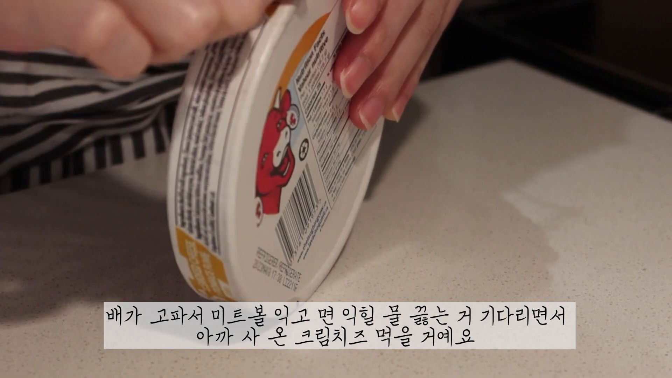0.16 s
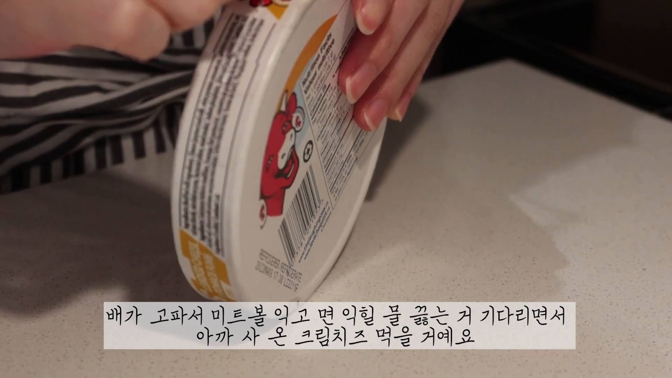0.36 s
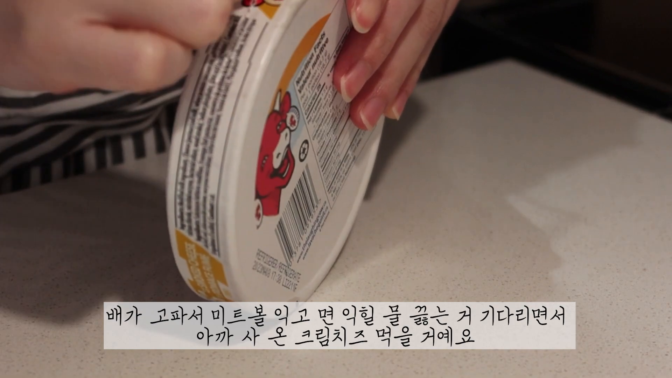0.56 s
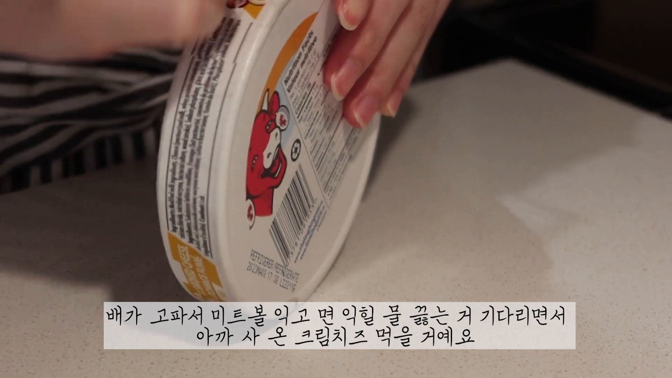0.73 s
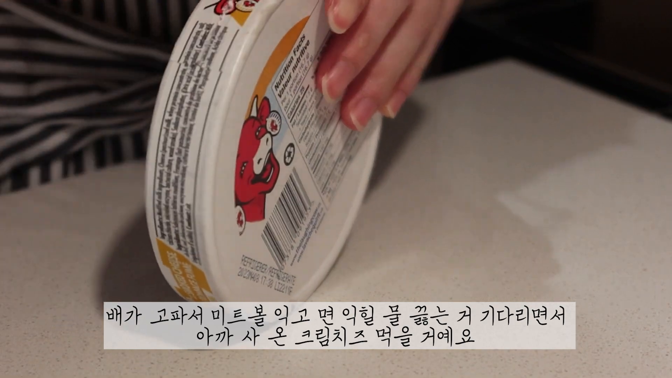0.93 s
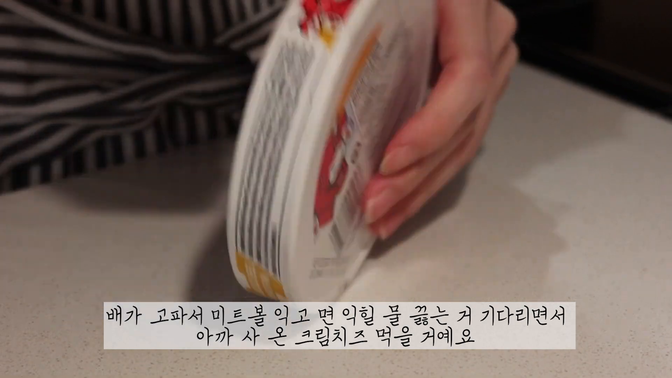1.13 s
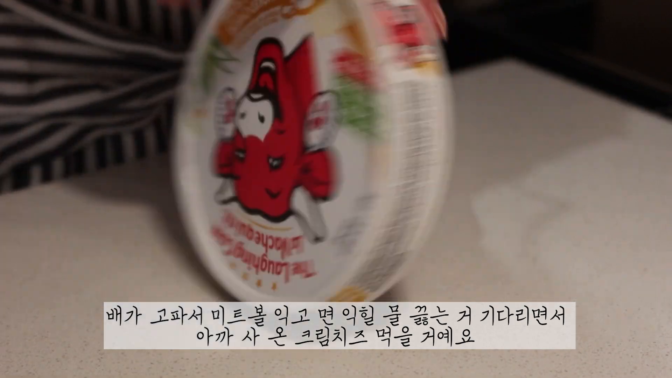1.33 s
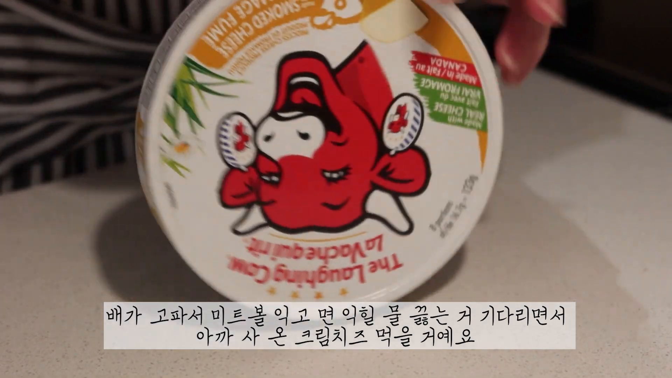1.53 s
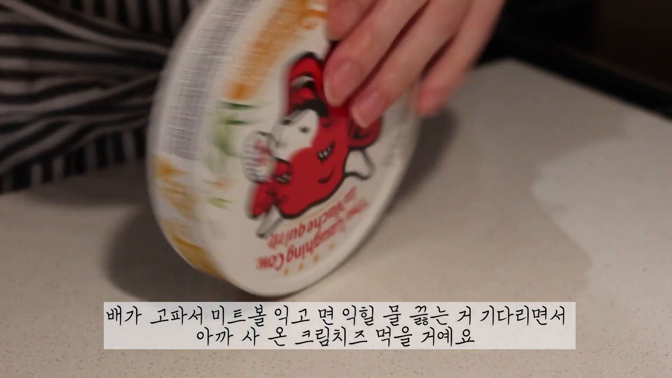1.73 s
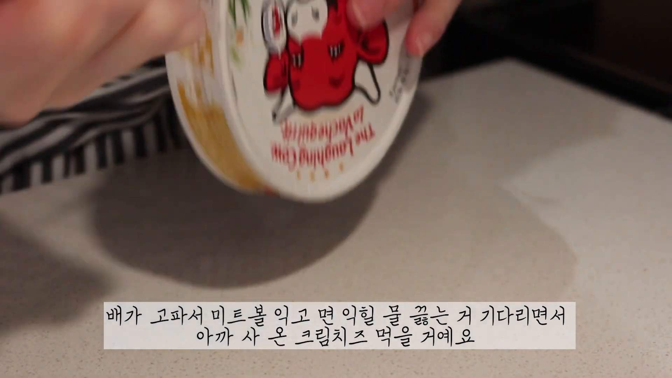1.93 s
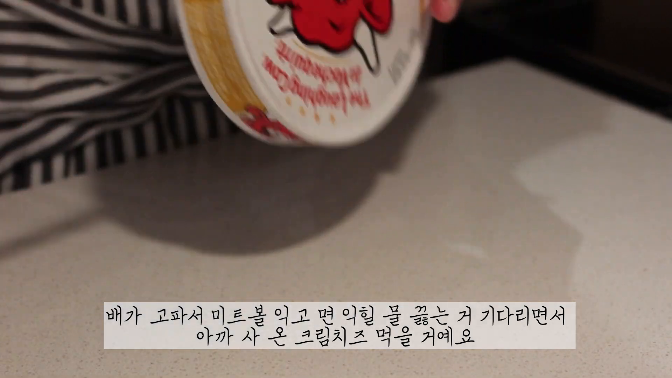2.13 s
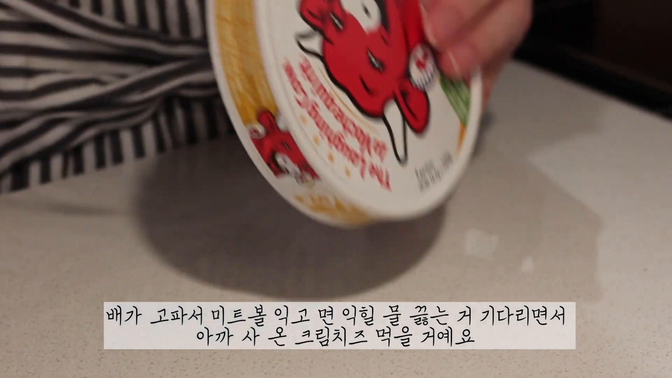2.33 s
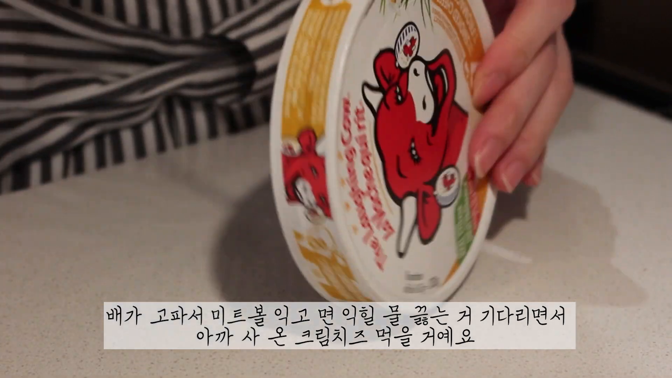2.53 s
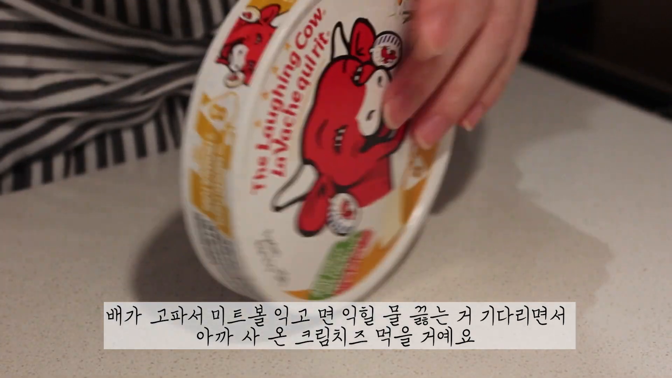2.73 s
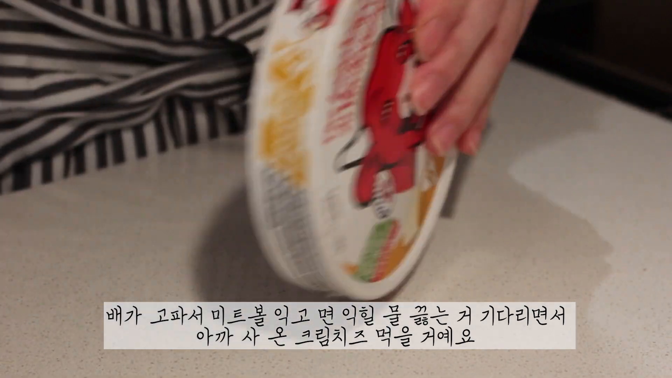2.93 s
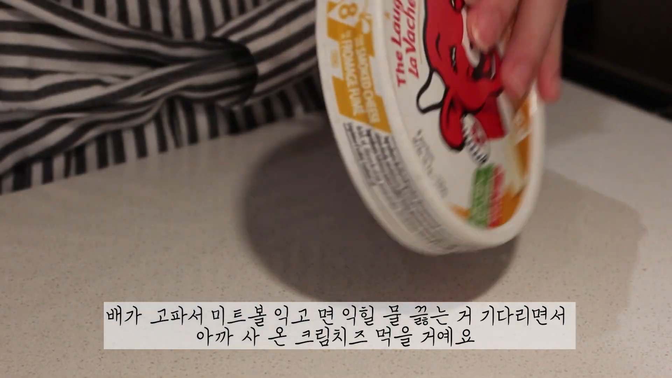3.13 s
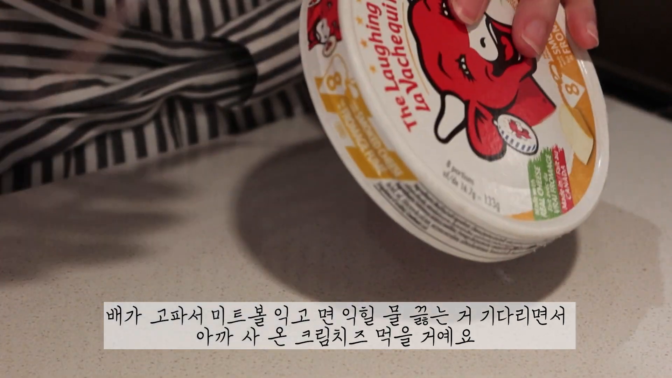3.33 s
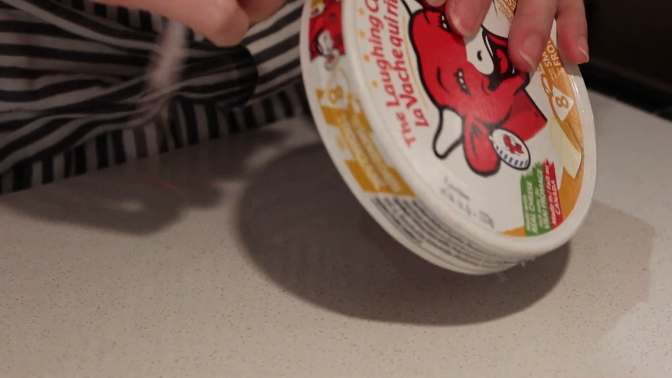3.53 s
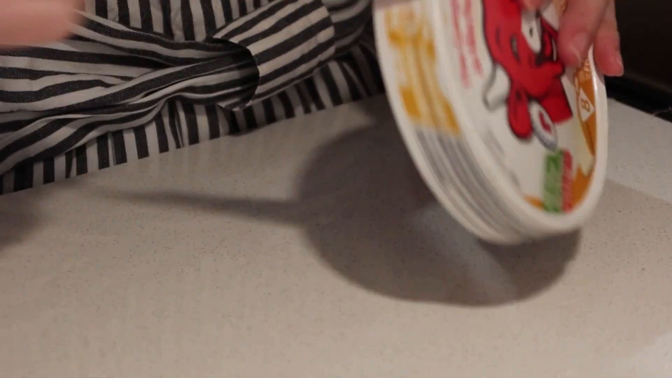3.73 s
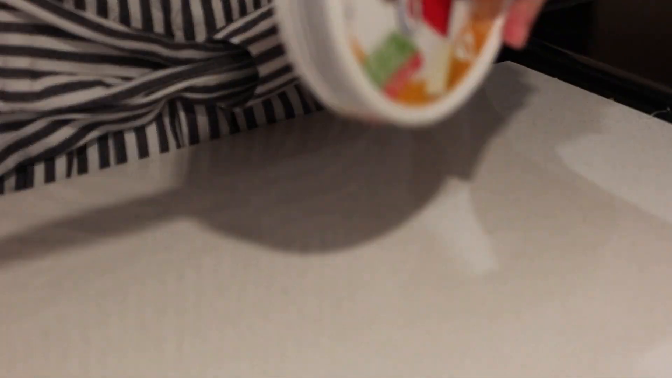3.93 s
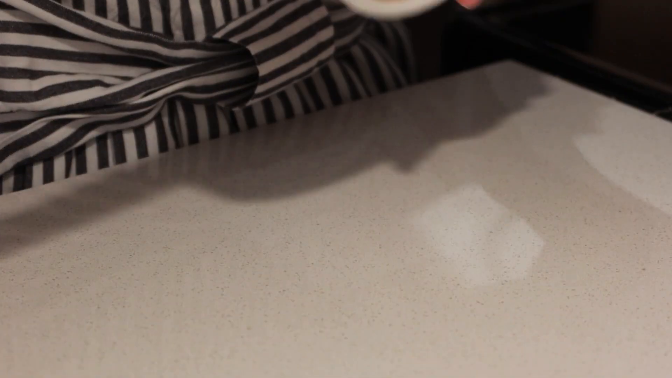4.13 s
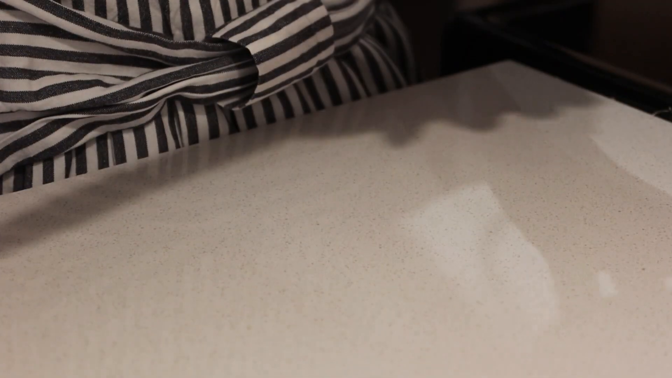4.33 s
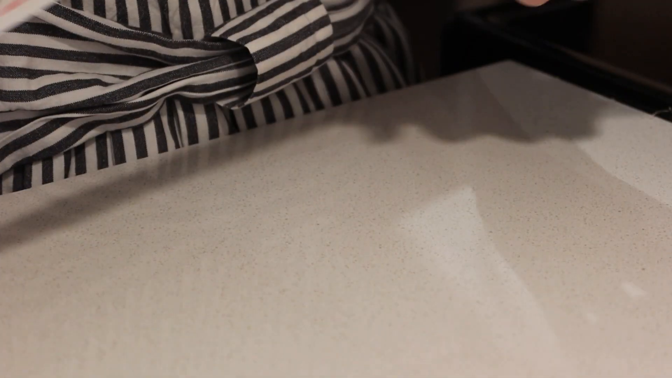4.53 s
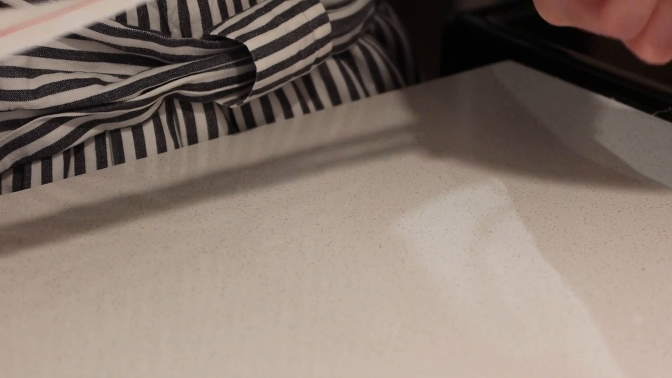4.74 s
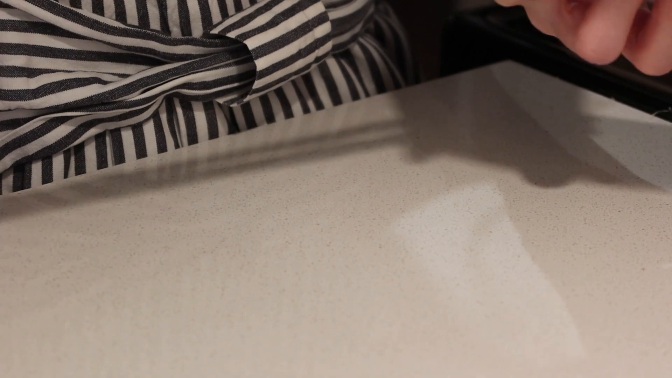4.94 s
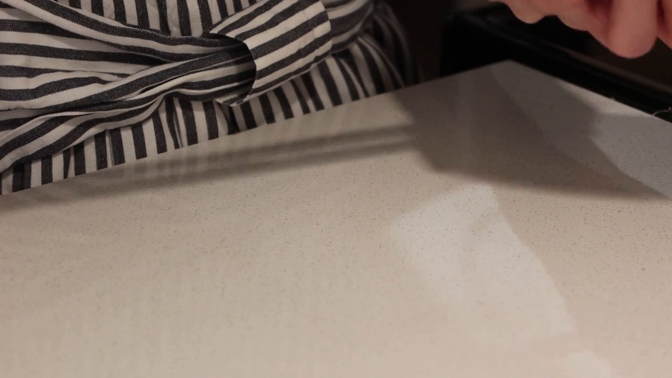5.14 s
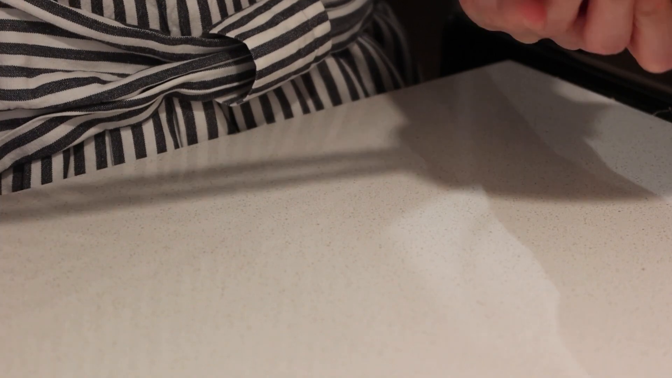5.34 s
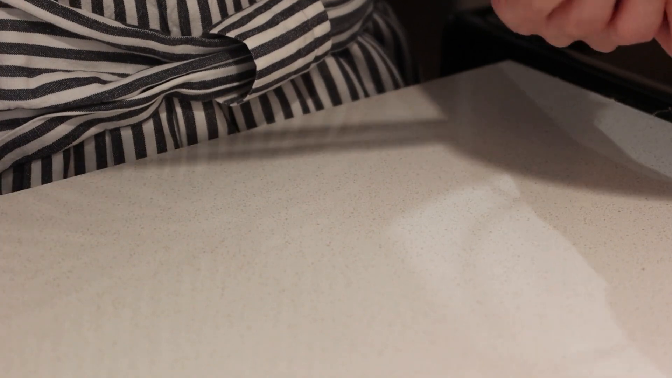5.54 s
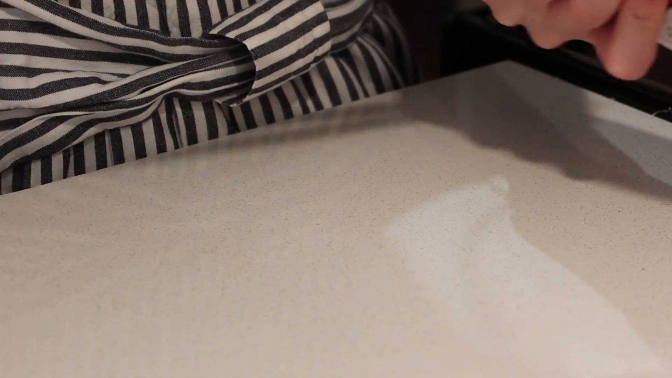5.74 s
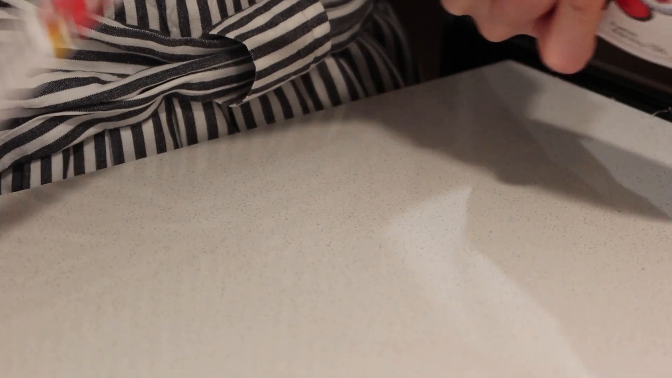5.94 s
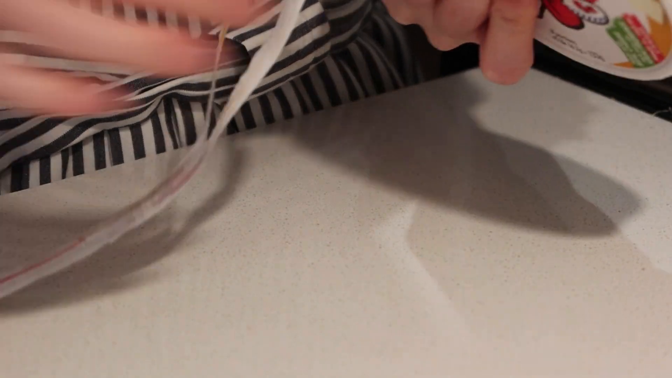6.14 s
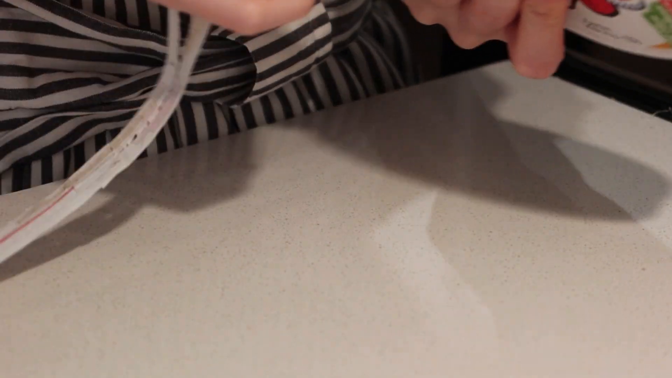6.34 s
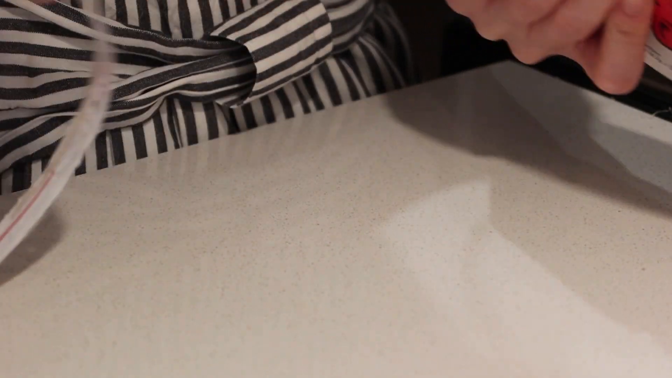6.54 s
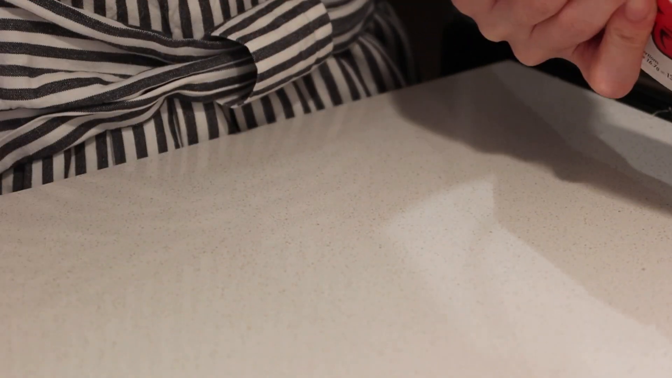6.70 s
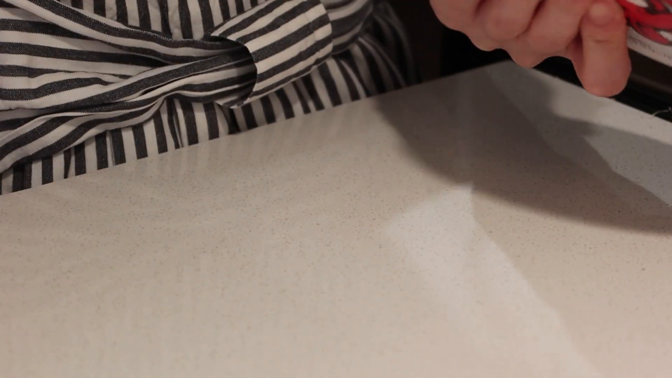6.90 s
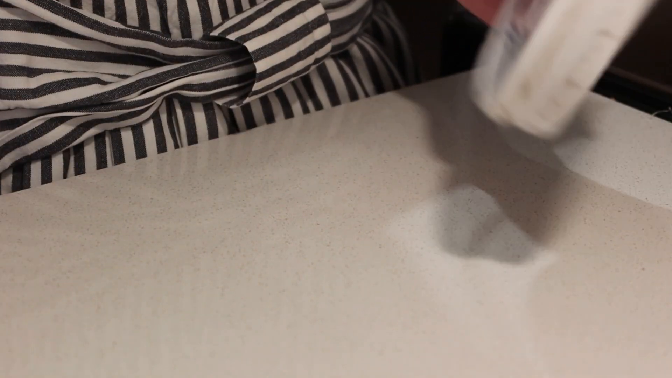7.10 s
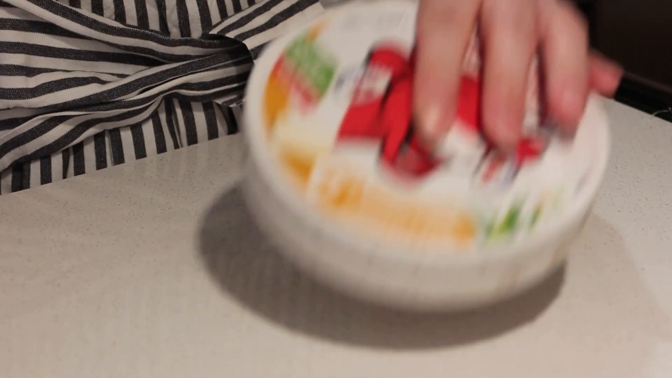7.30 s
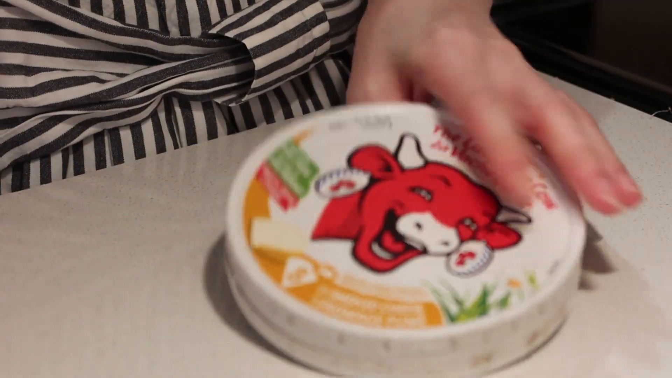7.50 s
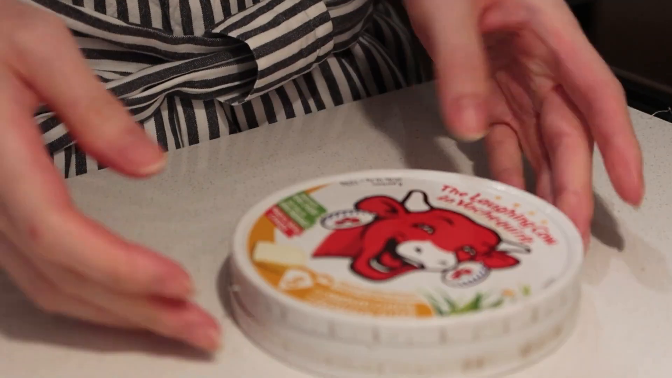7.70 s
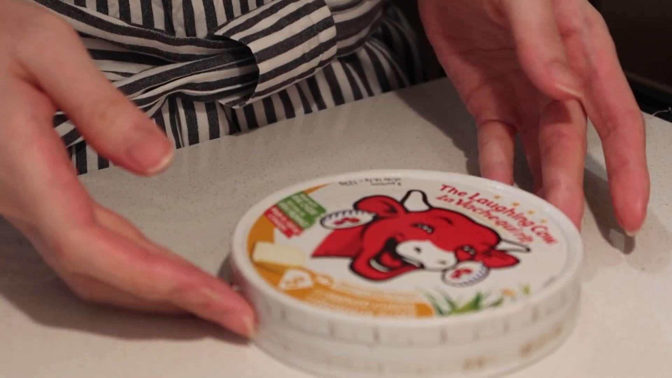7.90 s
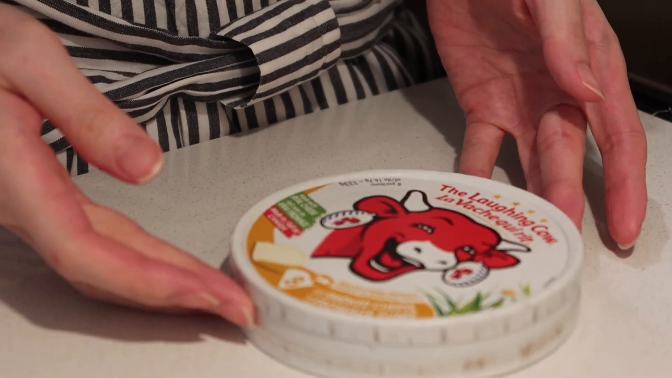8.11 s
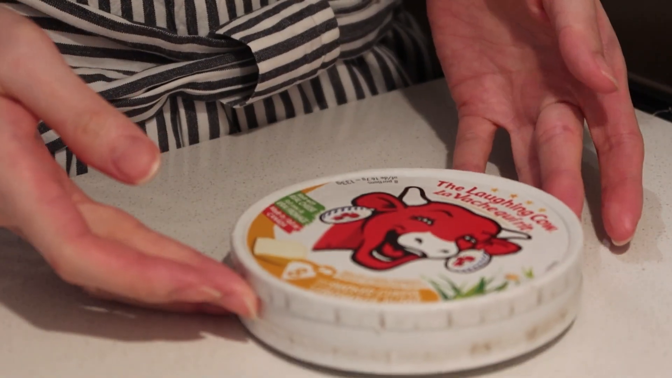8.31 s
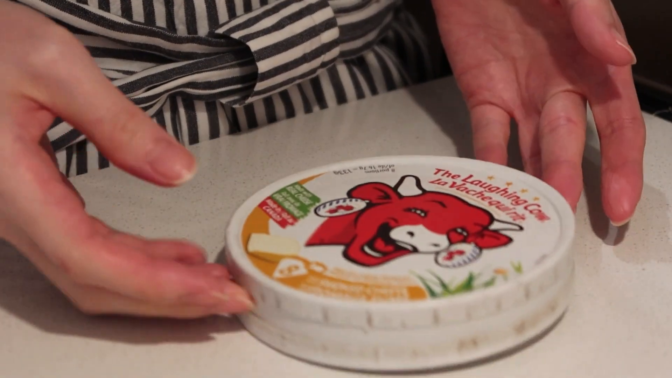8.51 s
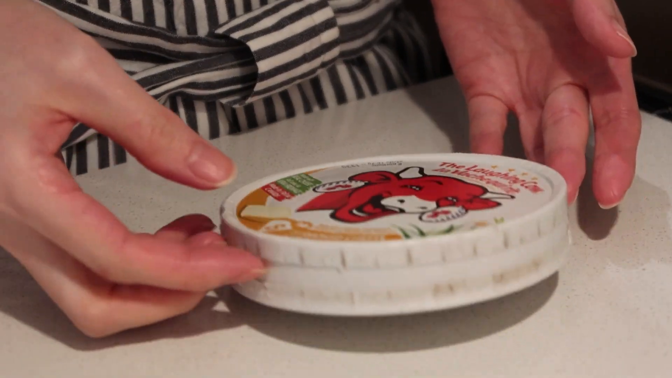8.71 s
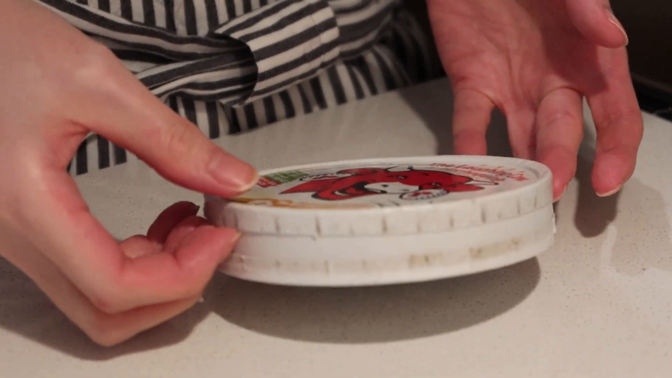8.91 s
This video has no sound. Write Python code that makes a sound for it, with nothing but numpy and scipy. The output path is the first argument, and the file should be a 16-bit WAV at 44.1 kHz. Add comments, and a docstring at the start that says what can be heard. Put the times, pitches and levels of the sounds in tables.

```python
"""Tearing open a cardboard box

A small kitchen with a fan humming, a camera's stereo microphones close by. A round cardboard box is
turned in the hands and its tear strip ripped off in pulls: breaking fibres and snapping paper ring
its rim, body, lid and wall. It is set down hard, the stone counter booms and the contents rattle."""
import sys
import numpy as np
from scipy import signal
from scipy.fft import rfft, irfft, next_fast_len
from scipy.io import wavfile
from scipy.ndimage import uniform_filter1d, map_coordinates

SR = 44100
rng = np.random.default_rng(int(sys.argv[2]) if len(sys.argv) > 2 else 0)


def to_wav(s):
    """Save 16-bit WAV."""
    ch = np.atleast_2d(s).T  # columns
    pcm = np.round(np.clip(ch, -1, 1) * 32767)  # PCM
    wavfile.write(sys.argv[1], SR, pcm.astype(np.int16))


N = 399546

# resonances of the box's rim, hollow body, lid and side wall: pitch_hz, width_hz, gain_db
RIM_MODES = [(1810, 86, -1.5), (1912, 47, 5), (2092, 68, -1), (2190, 43, 1.5), (2335, 42, -5.5)]
BODY_MODES = [(350, 64, -4.5), (429, 45, -8), (646, 97, -3), (1010, 25, -3.5)]
LID_MODES = [(1092, 47, -4.5), (1334, 85, 3), (1500, 65, 3.5), (1590, 145, -1)]
WALL_MODES = [(2535, 280, -0.5), (2906, 168, 3), (3052, 350, -1.5), (3950, 160, -16.5)]
# swells of rasp and fizz. The one at 7.66 s is a brief swell of rasp just before the box's second
# knock; the others are scuffs of fingers and contents.
# peak_s, rise_s, fall_s, rasp_db, fizz_db, body_db, lid_db, wall_db, crispness_db
SWELLS = [(0.096, .02, .03, -51.5, -72, -5, -9, -1, -8), (0.125, 0.046, 0.12, -70, -62, 2, -3, 2, -3),
          (0.358, .015, 0.024, -55, -51, -1, -4, -7, -1), (0.478, 0.039, 0.099, -58, -57.5, -2, 6, 5, -11),
          (1.16, 0.13, 0.13, -44.5, -49.5, -12, -5, -4, -7),
          (1.265, .1, .04, -46.5, -59, -7, -1, -3.5, -11),
          (1.354, 0.032, 0.084, -45, -48, -11, -1, -4.5, -4),
          (1.464, .024, 0.031, -42.5, -50, 8, 5.5, 1, -29), (1.72, .005, 0.088, -52, -58, 1, 5, 4, -11),
          (1.77, .008, 0.062, -45, -53, 3, 2, -7, -6), (1.84, 0.047, 0.1, -44.5, -47, -12, 1, -4, -8),
          (2.562, .08, 0.059, -42, -49.5, -7, -1, -4.5, -19),
          (2.631, 0.016, 0.016, -44, -56, -4, 0.5, -2, -12),
          (2.736, 0.15, 0.12, -39, -45, -18, 2.5, -5.5, -16),
          (2.854, 0.024, 0.049, -40.5, -60, -11, -3, -9, -19),
          (2.948, 0.083, 0.042, -57, -48, -3, -5, 8, 1),
          (3.034, 0.24, 0.028, -51.5, -55, -10, -4, 5.5, -13),
          (3.318, 0.25, 0.25, -60.5, -63, 3, 4, 4, -10), (3.495, .004, 0.064, -42.5, -45.5, 8.5, 5, 0, -16),
          (3.6, .01, .04, -46, -51, -13, -11, 0, -3), (3.624, .005, .04, -38, -34.5, -9, -9, -1, -10),
          (4.57, 0.059, 0.31, -44.5, -45.5, -15, -7, 2, -10),
          (4.712, 0.021, 0.025, -34.5, -33.5, -4.5, -7, 1.5, -9),
          (6.356, 0.059, 0.038, -50.5, -53.5, -1, -3, 0, -2), (6.812, 0.017, 0.11, -60, -51, 2, 6, 8, 4),
          (6.89, .03, 0.065, -55, -52, 2, 1, 1, -14), (6.94, 0.026, 0.041, -51, -51, -2, 1, -1, -15),
          (7.18, 0.21, 0.15, -49, -55, -5, -6, -4, -13), (7.287, 0.021, 0.066, -39, -51, -2, -2, -2.5, -27),
          (7.36, .1, 0.38, -61, -61, -8, -8, -9, -9), (7.5, 0.027, 0.028, -46, -56.5, -1, 2, 11, -20),
          (7.56, 0.12, 0.42, -41.5, -66, -8, -6, -1, -27), (7.64, .3, 0.025, -51, -66, -16, -1, -4.5, -11),
          (7.66, .012, .03, -33, -58, -5, 2, -3, -8), (7.73, .02, 0.046, -47, -52, 16, 8, -4, -13),
          (7.76, .04, 0.28, -47, -54.5, 2, 7, 4, -32), (8.034, 0.083, 0.04, -48, -63, -7, 6, -4, -12),
          (8.148, 0.051, 0.13, -59, -73, 1, 6, -3, -12), (8.304, .15, .2, -65, -76, 4, 10, -3, -10),
          (8.402, .04, .17, -62, -73, 6, -5, 3, -14), (8.55, 0.068, 0.17, -49, -59, -13, 2.5, -6, -16),
          (8.602, 0.0044, 0.096, -39, -47, -1.5, .5, -4, -19), (8.67, .04, .04, -46.5, -56, -2, 8, -3, -19),
          (8.697, .02, .03, -46, -57.5, -16, 9, -5, -21), (8.778, 0.024, 0.076, -50, -64, -9, 1, -6, -10),
          (8.871, 0.025, 0.042, -34, -45.5, -13, -1, -10.5, -6),
          (8.958, 0.014, .04, -46.5, -54, 2, -3, 2, -28), (9.03, 0.18, .3, -54, -70, -9, 0, -5, -10)]


def amp(db):
    return 10 ** (np.asarray(db) / 20)


def unit_rms(x):
    return x / np.sqrt(np.mean(x ** 2) + 1e-20)


def along(points, hz):
    """Interpolate (Hz, value) points on a log frequency axis."""
    knots_hz, values = np.transpose(points)
    return np.interp(np.log(hz + 1), np.log(knots_hz + 1), values)


def curves(rows):
    """One value per sample for each column after the time."""
    time_s, *columns = np.transpose(rows)
    return [np.interp(np.arange(N) / SR, time_s, column) for column in columns]


def wobble(rate):
    """A smooth random curve, rate knots a second."""
    return map_coordinates(rng.standard_normal(int(N * rate / SR) + 4), [np.arange(N) * rate / SR])


def filtered(x, response):
    """x through a complex response of frequency."""
    size = next_fast_len(x.shape[-1] + min(x.shape[-1], SR // 2))
    return irfft(rfft(x, size) * response(np.fft.rfftfreq(size, 1 / SR)), size)[..., :x.shape[-1]]


def modes(table):
    """Response of a set of resonances: those up to 800 Hz move in step, higher ones alternate in sign."""
    return lambda hz: sum(
        (-1) ** (k * (pitch > 800)) * amp(db) * 1j * hz * width / (pitch ** 2 - hz ** 2 + 1j * hz * width)
        for k, (pitch, width, db) in enumerate(table))


def stereo(pair, likeness):
    """Two unrelated versions of a sound become left and right microphones of a given likeness."""
    angle = lambda hz: np.arccos(np.clip(along(likeness, hz), -1, 1)) / 2
    mid, side = filtered(pair, lambda hz: np.array([np.cos(angle(hz)), np.sin(angle(hz))]))
    return np.array([mid + side, mid - side])


def kitchen_fan():
    """Room tone: a wavering mains hum, the fan's drone in the room modes and smooth air hiss."""
    hum_levels = [(0.0, -50), (0.33, -48), (1.06, -41), (2.24, -43.5), (2.65, -47.5), (2.85, -42.5),
                  (4.72, -43.5), (5.02, -45), (5.2, -42.5), (5.57, -56), (5.78, -50), (6.58, -49),
                  (6.9, -49.5), (7.67, -42), (8.05, -47.5), (8.73, -46.5), (9.06, -46)]  # the hum wavers: time_s, level_db
    room_modes = [(134, 13.4, 5), (156.6, 18.4, -4.5), (248, 81, -5.5), (348.4, 16.7, 2), (798, 39, -10.5)]  # resonances the fan drives: pitch_hz, width_hz, gain_db
    air_spectrum = [(12, -51), (20, -18), (88, -1.5), (119, 1), (162, -0.5), (192, -7), (345, -1),
                    (397, -32), (432, -49), (675, -19), (821, -15), (2970, -23), (3320, -23.5), (6300, -29),
                    (15800, -36.5)]  # colour of the hiss: frequency_hz, gain_db
    air_likeness = [(60, 1), (130, 0.96), (290, 0.75), (640, 0.12), (1410, 0.51), (3100, 0.35),
                    (6820, 0.46), (15000, -0.89)]  # room tone between the microphones: frequency_hz, correlation
    hum_db, = curves(hum_levels)
    hum_hz = 119.5 + 1.31 * wobble(5.6)
    hum = amp(hum_db + 0.83 * wobble(6)) * np.sin(2 * np.pi * np.cumsum(hum_hz) / SR)
    noise = rng.standard_normal((2, 2, N))
    drone = unit_rms(filtered(noise[0], lambda hz: modes(room_modes)(hz) * (hz < 1100)))
    air = unit_rms(filtered(noise[1], lambda hz: amp(along(air_spectrum, hz))))
    return hum + stereo(amp(-48.5 + wobble(5)) * drone + amp(-46.5) * air, air_likeness)


def rasp_and_fizz_levels():
    """Levels in dB: resting hands, pulls and swells add their powers."""
    pulls = [
        [(0.69, -59, -76), (0.7, -67, -51), (0.726, -65, -59), (0.812, -39.5, -45), (0.834, -40.5, -47),
         (0.864, -34, -41), (0.89, -40.5, -39.5), (1.0, -35.5, -37.5), (1.06, -36.5, -36), (1.092, -59, -61)],
        [(1.87, -50, -50), (1.928, -42, -38.5), (1.95, -44, -41.5), (2.168, -34.5, -34.5), (2.186, -28.5, -30),
         (2.248, -32, -29.5), (2.256, -41, -31), (2.274, -33.5, -35), (2.29, -55, -47), (2.4, -55, -60),
         (2.466, -66, -63)],
        [(3.664, -66, -54), (3.69, -35.5, -35), (3.74, -26, -31.5), (3.77, -36, -36), (3.82, -35.5, -32.5),
         (3.958, -46.5, -43), (4.062, -34.5, -36.5), (4.13, -41, -39), (4.15, -54, -54), (4.2, -51, -54),
         (4.22, -60, -58)],
        [(4.22, -58, -62), (4.244, -39.5, -42), (4.376, -34, -35.5), (4.468, -38, -36.5), (4.494, -41, -45),
         (4.522, -55, -66)],
        [(4.79, -78, -83), (4.815, -48, -62), (4.822, -35, -44), (4.865, -26.5, -33.5), (4.9, -32.5, -46),
         (4.958, -50, -56), (4.97, -33, -46), (5.0, -42, -59)],
        [(5.0, -52, -55), (5.026, -31.5, -45), (5.046, -30, -44.5), (5.072, -33, -37.5), (5.086, -34.5, -46),
         (5.15, -30, -36), (5.178, -32.5, -45.5), (5.228, -34, -41.5), (5.244, -43, -54), (5.27, -35, -41),
         (5.3, -50, -72)],
        [(5.3, -53, -64), (5.324, -33.5, -49), (5.356, -29.5, -45), (5.382, -38, -50.5), (5.44, -28.5, -34),
         (5.52, -34.5, -40.5), (5.544, -42.5, -47.5), (5.58, -41.5, -39), (5.718, -62, -68)],
        [(6.38, -60, -60), (6.426, -44, -50), (6.43, -30, -42.5), (6.466, -32, -40), (6.48, -27, -33),
         (6.51, -38, -34), (6.538, -46, -57), (6.7, -64, -66)],
    ]  # one curve for each pull on the strip: time_s, rasp_db, fizz_db
    t = np.arange(0, N / SR + .001, .001)
    power = amp([[-68.5], [-70.5]]) ** 2 * np.ones(len(t))  # hands that only hold the box
    for pull in pulls:
        time_s, *levels = np.transpose(pull)
        power += [amp(np.interp(t, time_s, db, left=-200, right=-200)) ** 2 for db in levels]
    for peak_s, rise_s, fall_s, rasp_db, fizz_db, *_ in SWELLS:
        drop_db = 20 * np.maximum((peak_s - t) / rise_s, (t - peak_s) / fall_s)
        power += amp([rasp_db - drop_db, fizz_db - drop_db]) ** 2
    return curves(np.column_stack([t, *10 * np.log10(power)]))


def grip():
    """The balance of body, lid, wall and crispness glides from one pull or swell to the next."""
    # what rings during the pulls: time_s, body_db, lid_db, wall_db, crispness_db
    pull_balance = [(0.82, -11, -7, -1, -9), (0.92, -7.5, -12, 5, -11), (1.0, -7, -8.5, 3, -10),
                    (1.06, -7.5, -8, -0.5, -6.5), (1.95, 0, -9.5, 4.5, -2), (2.1, -6.5, -4.5, -3, -6),
                    (2.2, -12, -10.5, -4, -4), (2.29, -4.5, -5, 5, -1), (3.72, -19, -13, -0.5, -2.5),
                    (3.83, -3, -1.5, 6.5, -7.5), (4.0, -10, -5, 1.5, -6.5), (4.27, -15, -8, -2, -5),
                    (4.4, -11, 1, 3.5, -9), (4.5, -11, -5, 3, -9), (4.85, -11.5, -8.5, -3.5, -10.5),
                    (5.08, -4, -8, -8, -11.5), (5.2, -12, -8, -3, -9), (5.33, -5.5, -7, -9, -8),
                    (5.42, -15, -8, -3.5, -6), (5.55, -5.5, -2, 1.5, -6), (6.44, -4.5, -5, 2.5, -5),
                    (6.52, -9, -1, -4, -18)]
    swell_balance = [(row[0], *row[5:]) for row in SWELLS]
    return curves(sorted(list(pull_balance) + swell_balance))


def fibres(clump_db, patchy_db):
    """Fibres let go in clumps of a few ms; the colour drifts in patches as the sheet bends."""
    push = rng.standard_normal((2, N)) * amp(clump_db * (wobble(260) + 0.47 * wobble(70)))
    spectra = signal.stft(push, nperseg=256)[2]
    patches = uniform_filter1d(rng.standard_normal(spectra.shape[1:]), size=2, axis=0)
    patches = uniform_filter1d(patches, size=14, axis=1)
    return signal.istft(spectra * amp(patchy_db * unit_rms(patches)), nperseg=256)[1][:, :N]


def paper(hz):
    """Colour of the loose strip: broad fizz with a few soft resonances."""
    fizz_spectrum = [(1880, -70), (3200, -3.5), (4210, 1), (4500, -1.5), (5150, -0.5), (5960, -4),
                     (7850, -2), (9150, -8), (11600, -11), (13500, -9.5), (15800, -16.5)]  # paper fibres: frequency_hz, gain_db
    strip_modes = [(4660, 110, 8), (5306, 57, 10), (6040, 810, 1.5), (7400, 100, -5), (13400, 560, -6)]  # resonances of the strip: pitch_hz, width_hz, gain_db
    return amp(along(fizz_spectrum, hz)) * (1 + 0.42 * np.abs(modes(strip_modes)(hz)))


def tearing_and_rasping():
    """The same fibre noise drives a rasp in every part of the box and a fizz in the open paper."""
    rasp_db, fizz_db = rasp_and_fizz_levels()
    body_db, lid_db, wall_db, _ = grip()
    push = fibres(clump_db=2.0, patchy_db=3.5)
    parts = [(RIM_MODES, -3.5), (BODY_MODES, body_db),
             (LID_MODES, lid_db - 2.0), (WALL_MODES, wall_db - 2.5)]
    rasp = sum(amp(db) * unit_rms(filtered(push, modes(part))) for part, db in parts)
    fizz = unit_rms(filtered(push, paper))
    return amp(rasp_db) * rasp + amp(fizz_db + 0.5) * fizz


def crisped(x):
    """Taut dry paper adds top treble, soft fingertips and card take it away."""
    treble = filtered(x, lambda hz: 1 / (1 + (9500 / (hz + 1)) ** 8))
    crispness_db = grip()[-1]
    return x + (amp(crispness_db + 11.5) - 1) * treble


def contacts(table, blow_s, ring_s, crackle_s, soft_hz, gain_db):
    """Short rough blows ring the box and crackle the paper; each length is a fade of 60 dB."""
    out, t = np.zeros((2, N + SR)), np.arange(SR // 16) / SR
    starts_s, rim_db, body_db, lid_db, wall_db, crackle_db = np.transpose(table)[:, :, None, None]
    noise = rng.standard_normal((len(table), 2, 2, len(t)))
    unit_peak = lambda x: x / np.abs(x[:, :1]).max(axis=-1, keepdims=True)
    soft = lambda hz: 1 / (1 + 1j * hz / soft_hz) ** 2
    fade = lambda length_s: amp(-60 * t / length_s)
    blow = (noise[:, 0] + 3.1 * (t == 0)) * fade(blow_s)  # a firm first touch, then roughness
    # card under a hand or on the counter loses its ring quickly
    ring = lambda part: unit_peak(filtered(blow, lambda hz: modes(part)(hz) * soft(hz)) * fade(ring_s))
    parts = [(RIM_MODES, 0), (BODY_MODES, body_db), (LID_MODES, lid_db), (WALL_MODES, wall_db)]
    box = sum(amp(db) * ring(part) for part, db in parts)
    fizz = filtered(noise[:, 1], lambda hz: paper(hz) * np.abs(soft(hz / 2)))
    crackle = amp(crackle_db) * unit_peak(fizz * fade(crackle_s))
    for start_s, hit in zip(starts_s.ravel(), amp(rim_db + gain_db) * (box + crackle)):
        out[:, round(start_s * SR):][:, :len(t)] += hit
    return out[:, :N]


def paper_snaps():
    """Snaps and finger taps ring lid and wall as the grip of the moment allows."""
    snaps = [(0.7084, -57, 8, 5), (1.2184, -42, -4, -9), (1.3374, -44, -4, 5), (1.4606, -36, 6, -10),
             (1.7164, -36.5, -7, -10), (1.731, -35, -6, -4), (1.7644, -39, 5, -11), (1.8083, -38, 2, 6),
             (1.8352, -29, -11, -13), (1.8522, -33, -9, -9), (2.5486, -32.5, -4, -15),
             (2.7264, -29, -14, -11), (2.9512, -47, -1, 0), (3.495, -35.5, 11, -2), (3.6212, -32.5, -17, 2),
             (3.6696, -37, -15, 4), (4.0228, -31, -8, 9), (4.2373, -32, -18, -8), (4.2677, -27.5, -19, -2),
             (4.3111, -22.5, -22, 3), (4.3434, -24, -16, -6), (4.3784, -21, -16, 6), (4.3989, -24, -18, -9),
             (4.4857, -22.5, -17, -11), (4.558, -31.5, -11, -8), (4.7077, -34, -12, 7),
             (4.8204, -27, 4, -3), (4.9217, -22, -22, -22), (4.9691, -27, -18, -19),
             (5.0144, -26, -21, 0.5), (5.023, -16, -15, -13), (5.0274, -22, -7, -8),
             (5.0709, -24.5, -19, -16), (5.0978, -23, -6, -16), (5.1372, -24.5, -12, -16),
             (5.1856, -16, -28, -20), (5.1964, -19, -19, -14), (5.2235, -21, -17, -19),
             (5.2555, -25, -9, -10), (5.2694, -20, -9, -14), (5.3168, -30, -6, -2), (5.3507, -17, -25, -16),
             (5.3981, -23, -17, -6), (5.4445, -16, -13, -19), (5.4544, -27, -20, -11),
             (5.5064, -19, -18, -14), (6.3535, -43, -8, -6), (6.4128, -35, -8, -3), (6.4293, -23, -3, -9),
             (6.4424, -29, -6, -11), (6.4604, -24, -10, -7), (6.4777, -18, -12, -11), (6.8114, -52, -6, -2),
             (6.8339, -48, 0, 0), (6.8907, -47, -1, -2), (6.9396, -39, -11, 1), (7.1851, -36, -2, -11),
             (7.2823, -30.5, -10, -20), (8.0232, -45, -5, -17), (8.6009, -27.5, -20, -19),
             (8.6104, -29.5, -1, -12), (8.6652, -36, -11, -16), (8.7794, -31.5, -5, -23),
             (8.8548, -36, -14, -16), (8.9555, -38, -5, -16)]  # snaps and taps: start_s, rim_db, then relative to the rim body_db, crackle_db
    start_s, rim_db, body_db, crackle_db = np.transpose(snaps)
    _, lid_db, wall_db, _ = (curve[np.round(start_s * SR).astype(int)] for curve in grip())
    table = np.transpose([start_s, rim_db, body_db, lid_db - 2.5, wall_db - 2.5, crackle_db])
    return contacts(table, blow_s=0.0071, ring_s=0.035, crackle_s=0.029, soft_hz=5060, gain_db=-1.0)


def counter_booms():
    """Soft low pushes ring the counter top, which is too small to radiate deep bass."""
    thuds = [(1.212, -29), (1.258, -32), (1.464, -26), (2.622, -29), (3.329, -29), (7.4646, -18),
             (7.51, -35), (7.676, -22), (7.748, -28.5)]  # the box pushes on the counter: start_s, peak_db
    counter_modes = [(78, 16, -9.5), (112, 19.5, 2.5), (161.4, 21, -2), (230, 17, -7)]  # resonances of the stone top: pitch_hz, width_hz, gain_db
    impulse = np.arange(SR // 2) == 0
    bass_band = lambda hz: (1j * hz / (70 + 1j * hz) / (1 + 1j * hz / 160)) ** 2
    boom = filtered(impulse, lambda hz: modes(counter_modes)(hz) * bass_band(hz))
    blows = np.zeros(N)
    for start_s, peak_db in thuds:
        blows[round(start_s * SR)] = amp(peak_db)
    return signal.fftconvolve(blows, boom / np.abs(boom).max())[:N]


def box_landing():
    """The box hits the stone and bounces, ringing longer and duller than a snap."""
    # impacts: start_s, rim_db, then relative to the rim body_db, lid_db, wall_db, crackle_db
    bounces = [(7.4622, -6.5, -4, -4, -13, -16.5), (7.4655, -15, 3.5, -8, 4, -16),
               (7.67, -12, -7, -1, -11, -5), (7.675, -13.5, -6, -1, 4.5, 0.5),
               (7.6821, -15, 4, 8, 0.5, -26), (7.6889, -18.5, 5, 11, 4, -20), (7.6944, -24, 8, 7, -6, -16),
               (7.703, -26, 6, -6, 0, -14)]
    return contacts(bounces, blow_s=0.003, ring_s=0.062, crackle_s=0.059, soft_hz=2470, gain_db=2.0)


def kitchen_reverb(x):
    """The walls answer about 7 ms late, each frequency dying at its own speed."""
    decay_times = [(150, 0.11), (1000, 0.21), (3000, 0.41), (8000, 0.12), (15000, 0.11)]  # the room's ring: frequency_hz, t60_s
    hz, t, spectra = signal.stft(rng.standard_normal((2, SR // 2)), SR, nperseg=256)
    tail = signal.istft(spectra * amp(-60 * t / along(decay_times, hz)[:, None]), SR, nperseg=256)[1]
    return signal.fftconvolve(np.pad(x, (300, 0))[None], tail / np.linalg.norm(tail[0]), axes=1)[:, :N]


def scene():
    """The box close to the microphones and a hair to the right, over the counter and the room tone."""
    box_likeness = [(60, 0.95), (150, 1), (380, 1), (950, 1), (2380, 0.99), (5980, 0.63), (15000, 0.033)]  # the box between the microphones: frequency_hz, correlation
    handling = tearing_and_rasping() + paper_snaps()
    landing = box_landing()
    reverb = kitchen_reverb(amp(-13.5) * handling[0] + amp(-12.5) * landing[0])
    box = stereo(crisped(handling + landing + reverb), box_likeness) * amp([[-.3], [.3]])
    return box + counter_booms() + kitchen_fan()


def record(dry):
    """The camera rounds off the very loudest peaks and keeps nothing above its band limit."""
    ceiling, top_hz = 0.97, 15870
    rounded = dry / (1 + np.abs(dry / ceiling) ** 6) ** (1 / 6)
    return filtered(rounded, lambda hz: hz < top_hz)


dry = scene()
out = record(dry)
to_wav(out)
```